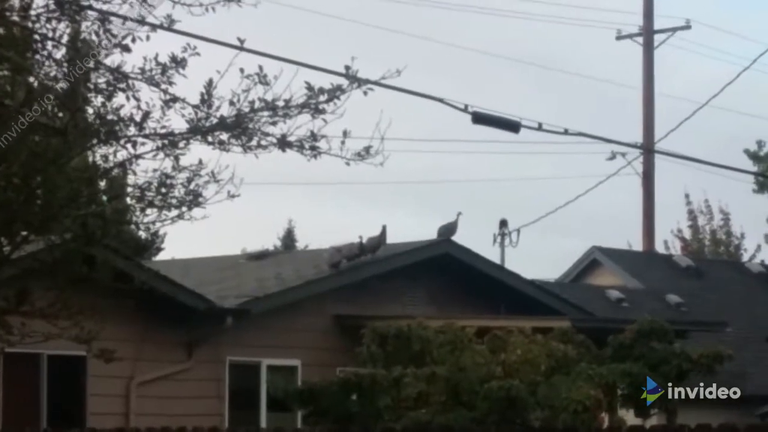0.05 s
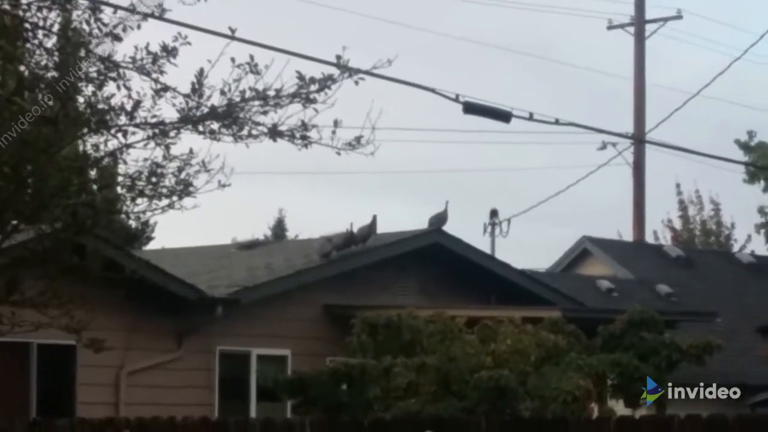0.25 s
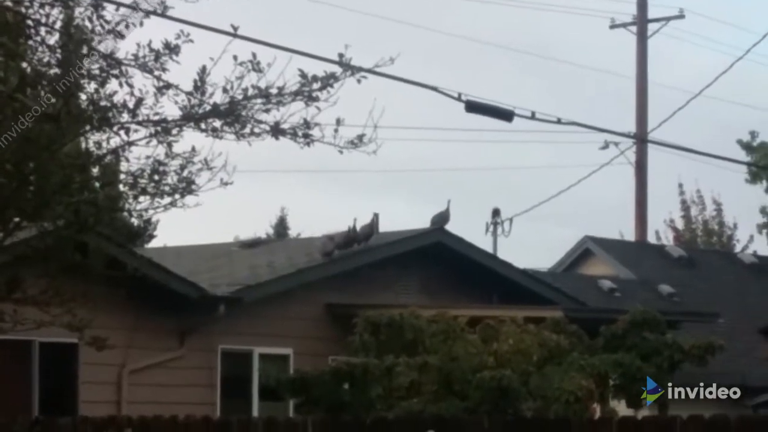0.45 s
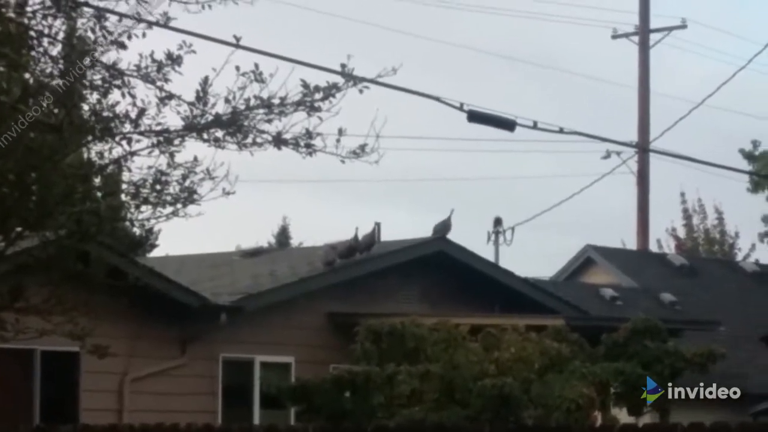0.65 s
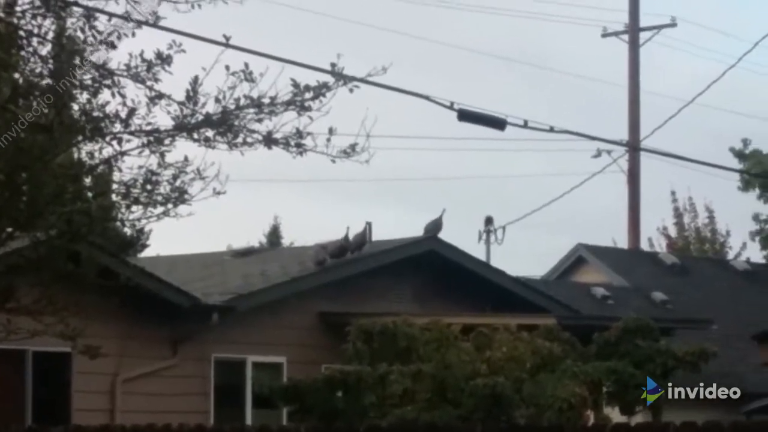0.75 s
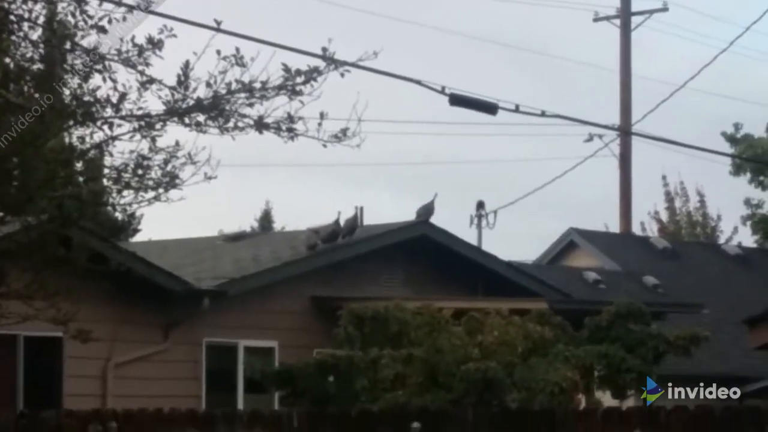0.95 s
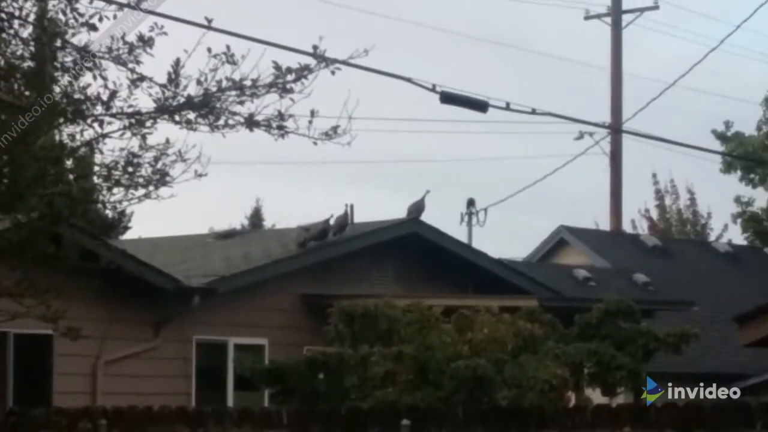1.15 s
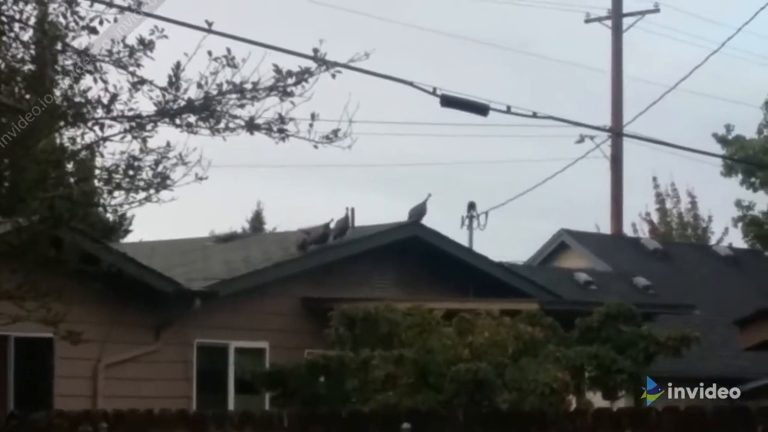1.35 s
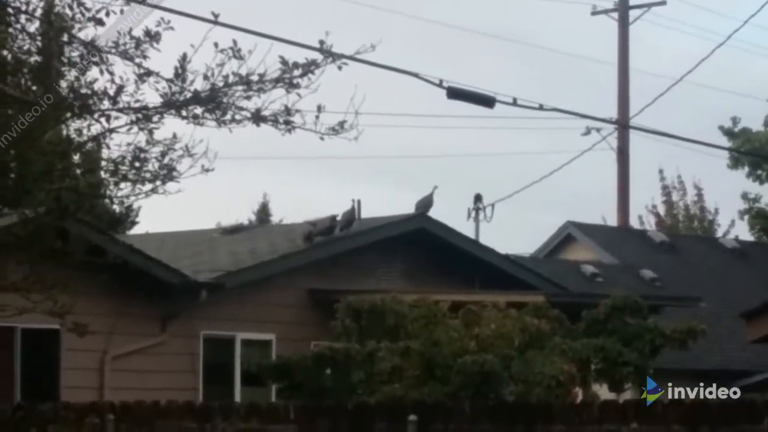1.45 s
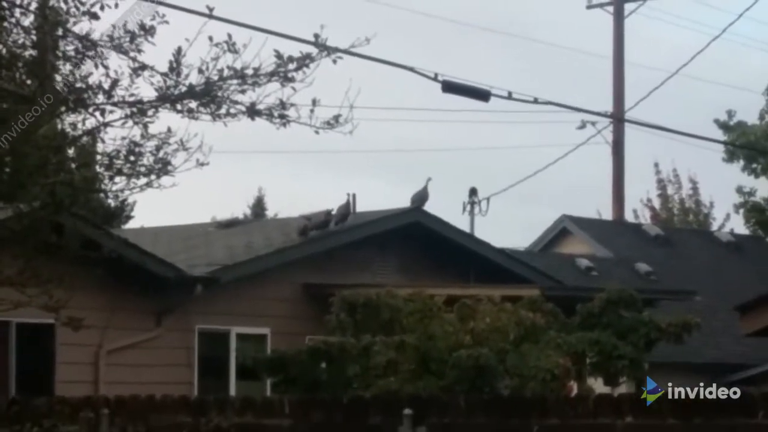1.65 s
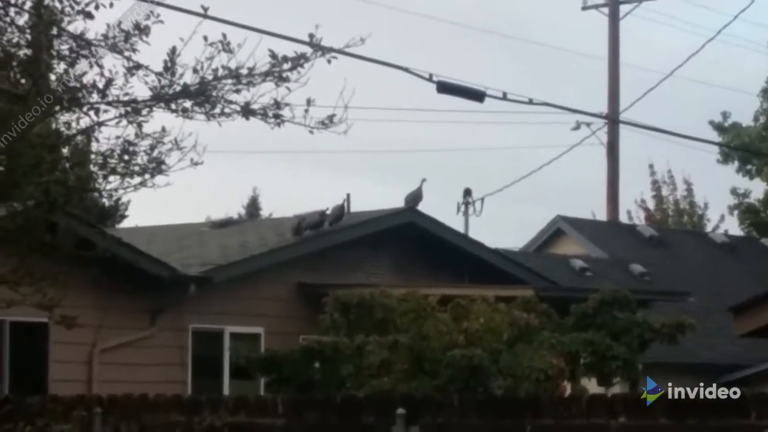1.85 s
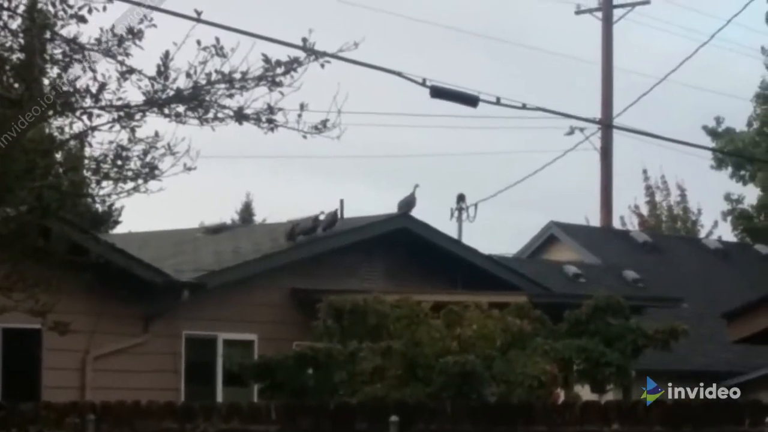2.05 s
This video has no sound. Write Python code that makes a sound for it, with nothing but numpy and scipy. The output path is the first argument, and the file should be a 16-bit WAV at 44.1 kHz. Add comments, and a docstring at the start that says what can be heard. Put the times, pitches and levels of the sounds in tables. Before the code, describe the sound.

Harsh, raspy cackling of several guinea fowl across a street, with thin echoes and low distant traffic

```python
"""Guinea fowl across a street

Several guinea fowl on a roof across the street cackle in short harsh notes: pulse trains and noise
drive windpipe, throat and beak resonances. Clear pips are single gliding tones.
Houses send the calls back as a thin long tail of scattered echoes. Beneath lie distant traffic,
made of shaped noise, a wavering low hum of two sines, and a few soft low bumps.
"""
import sys
import numpy as np
from scipy import signal
from scipy.fft import rfft, irfft
from scipy.io import wavfile
from scipy.ndimage import uniform_filter1d

SR = 44100
rng = np.random.default_rng(int(sys.argv[2]) if len(sys.argv) > 2 else 0)


def waveform_to_disk(signal):
    """Save audio, clipped to [-1, 1], as 16-bit WAV at the path in sys.argv[1]."""
    frames = np.transpose(np.atleast_2d(signal))
    scaled = np.clip(frames, -1, 1) * 32767
    samples = np.round(scaled).astype(np.int16)
    wavfile.write(sys.argv[1], SR, samples)


N = 92610
LEAD = 4410  # samples kept ahead of time zero, for a note already under way


def gain_of(db):
    """Level law: 20 dB is a factor of ten in amplitude."""
    return 10 ** (np.asarray(db) / 20)


def evened(x):
    """Normalisation to unit root-mean-square amplitude."""
    return x / np.sqrt(np.mean(x ** 2) + 1e-20)


def curve_at(points, hz):
    """Interpolation along logarithmic frequency, as hearing spaces pitch."""
    f, value = np.transpose(points)
    return np.interp(np.log(hz + 1), np.log(f + 1), value)


def add(mix, s, sound):
    """Superposition: pressures sum, from time s [s] onward."""
    part = mix[..., LEAD + round(s * SR):][..., :sound.shape[-1]]
    part += sound[..., :part.shape[-1]]


def resonate(x, hz, width_hz):
    """Heterodyne resonance: a double pole of unit peak gain follows a moving centre frequency."""
    turn = np.exp(2j * np.pi * np.cumsum(hz * np.ones(len(x))) / SR)
    r = np.exp(-np.pi * width_hz / SR)
    lowpassed = signal.lfilter([(1 - r) ** 2], [1, -2 * r, r * r], x / turn)
    return 2 * (turn * lowpassed).real


def placed(x, lead):
    """Interaural delay as linear phase: the left channel leads by a fraction of samples."""
    x = np.pad(x, 16)
    half_leads = lead * np.array([[1], [-1]])
    shift = np.exp(1j * np.pi * np.fft.rfftfreq(len(x)) * half_leads)
    return irfft(rfft(x) * shift, len(x))[:, 16:]


def note(start, length, db, swell_db, hz0, hz1, rough, beak0_hz, beak1_hz, low_db, high_db, lead):
    """Source and filter: uneven cycles and noise echo in the windpipe and ring throat and beak."""
    # broad rasp of the throat: (frequency [Hz], gain [dB])
    throat = [(300, -11), (900, -3), (2500, 1.5), (4600, -7.5), (5600, -20.5), (8000, -21.5), (11000, -30),
              (15000, -35)]
    rise_s, rise_share, fall_s = .003, .14, .007  # longer notes set in more slowly
    jitter, ragged_db = .1, 1.8  # pitch and level unevenness, both scaled by roughness below
    windpipe_hz, windpipe_echo = 565, .2
    beak_width_hz = 480  # widened by roughness below
    low_hz, low_width_hz, high_hz, high_width_hz = 1700, 300, 4150, 520
    rasp_db = -4.5  # at full roughness
    side_bird_hz, side_bird_db = 5070, -15

    noise, phase = rng.standard_normal((3, 4000)), rng.random((36, 1))
    t = np.arange(0, min(length + 0.002, .09), 1 / SR)
    u, rough = t / length, np.clip(rough, 0, 1)
    shake, ragged = (evened(uniform_filter1d(v, size=130))[:len(t)] for v in noise[:2])

    pulse_hz = (hz0 + (hz1 - hz0) * u) * (1 + jitter * rough ** 2 * shake)
    turns = np.cumsum(pulse_hz) / SR
    harmonics = np.arange(1, 37)[:, None]
    cycles = np.cos(2 * np.pi * (harmonics * turns + phase)).sum(0)
    drive = (1 - rough) * evened(cycles) + rough * noise[2, :len(t)]

    rise = t / (rise_s + rise_share * length)
    fall = (length + 0.0038 - t) / fall_s
    edge = np.sin(np.pi / 2 * np.clip(np.minimum(rise, fall), 0, 1))
    drive *= edge * gain_of(swell_db * (2 * u - 1) + ragged_db * np.sqrt(rough) * ragged)
    # feedback comb: each pass along the windpipe returns weaker
    round_trip = round(SR / windpipe_hz)
    drive = signal.lfilter([1], np.r_[1, np.zeros(round_trip - 1), -windpipe_echo], drive)

    arch = np.sin(np.pi * np.clip(u, 0, 1)) ** .6  # the outer colours bloom mid-note
    throat_gain = gain_of(curve_at(throat, np.fft.rfftfreq(len(t), 1 / SR)))
    rasp = arch * irfft(rfft(drive) * throat_gain, len(t))
    beak_hz = beak0_hz + (beak1_hz - beak0_hz) * u
    voice = resonate(drive, beak_hz, beak_width_hz * (0.96 + rough))
    voice += gain_of(rasp_db) * rough * rasp
    voice -= arch * gain_of(low_db) * resonate(drive, low_hz, low_width_hz)
    voice -= arch * gain_of(high_db) * resonate(drive, high_hz, high_width_hz)
    if lead > 3:  # the bird on the left sounds brighter: an extra top resonance
        voice += gain_of(side_bird_db) * resonate(drive, side_bird_hz, 970)
    return start, placed(gain_of(db) * evened(voice), lead)


def street(x):
    """Reverberation: a few quick roof reflections, then scattered echoes that die band by band."""
    # decay of the houses' echoes: (frequency [Hz], time to fall 60 dB [s])
    decay = [(600, 2.5), (2000, 1.73), (4000, 1.68), (7000, 0.32)]
    # colour that makes the echoes flatter than the calls: (frequency [Hz], gain [dB])
    tail_colour = [(500, 4), (1200, 7), (2600, -2), (4000, -2), (5200, 13), (8000, 6)]
    near_db, near_s, tail_db = -7, 0.012, -11.5
    tail_shared = .35  # share of each channel's echoes lent to the other

    taps = rng.choice([-1., 1.], (2, SR)) * (rng.random((2, SR)) < .04)
    taps = taps + tail_shared * taps[::-1]
    t = np.arange(SR) / SR
    near = taps * np.exp(-t / near_s) * (t > .001)
    hz, frame_s, z = signal.stft(taps * np.clip(t / 0.044, 0, 1), SR, nperseg=256)
    fall_db = 60 * frame_s / curve_at(decay, hz)[:, None]
    z = z * gain_of(curve_at(tail_colour, hz)[:, None] - fall_db)
    tail = signal.istft(z, SR, nperseg=256)[1][:, :SR]
    both = gain_of(near_db) * near / np.linalg.norm(near[0])
    both += gain_of(tail_db) * tail / np.linalg.norm(tail[0])
    return signal.fftconvolve(x[None], both, axes=1)[:, :len(x)]


def traffic():
    """Filtered random noise: short-time spectra with drifting patches and a slow swell."""
    # traffic spectrum: (frequency [Hz], relative density [dB per Hz])
    spectrum = [(25, -21), (50, -23), (75, -3.5), (120, -4.5), (160, -13.5), (250, -10.5), (430, -12.5),
                (730, -3.5), (1000, -2.5), (1400, -9.5), (2100, -11.5), (4100, -18), (4700, -31),
                (8000, -31), (15800, -31)]
    # likeness of the two channels: (frequency [Hz], left-right correlation [0-1])
    likeness = [(30, 1), (120, 1), (200, 1), (400, 0.86), (800, .3), (2000, 0.1), (5000, 0.13),
                (9000, 0.033), (14000, 0.2)]
    level_db, patch_db, swell_db = -44.5, 2.05, 0.75

    frames, hz = N // 512 + 6, np.fft.rfftfreq(2048, 1 / SR)
    a, b, c, d, patches = rng.standard_normal((frames, 1025, 5)).T
    patches = uniform_filter1d(uniform_filter1d(patches, size=16, axis=0), size=5, axis=1)
    swell = evened(uniform_filter1d(rng.standard_normal(frames), size=6))
    same = np.clip(curve_at(likeness, hz), -1, 1)[:, None]
    left = a + 1j * b
    right = same * left + np.sqrt(1 - same ** 2) * (c + 1j * d)
    colour_db = curve_at(spectrum, hz)[:, None] + patch_db * evened(patches) + swell_db * swell
    z = np.array([left, right]) * gain_of(colour_db)
    rumble = signal.istft(z, nperseg=2048, noverlap=1536)[1][:, 1024:N + 1024]
    return gain_of(level_db) * evened(rumble)


def hum():
    """Harmonic pair: a low drone and its octave, each wavering in level."""
    # drone: (time [s], frequency [Hz], level before the waver [dB])
    drone = [(0.0, 192.7, -81), (0.03, 190.8, -62), (0.47, 189.3, -56), (0.88, 188.8, -63.5),
             (0.95, 198.8, -62), (1.08, 184.3, -56), (1.23, 200.0, -65.5), (1.65, 184.9, -58),
             (2.1, 184.4, -67)]
    octave_db, waver_db = -5, 4
    s, hz, db = np.transpose(drone)
    t = np.arange(N) / SR
    turns = np.cumsum(np.interp(t, s, hz)) / SR
    waver = uniform_filter1d(rng.standard_normal((2, N)), size=1500)
    waver = evened(uniform_filter1d(waver, size=1500))
    level_db = np.interp(t, s, db) + waver_db * waver + [[0], [octave_db]]
    tones = np.sqrt(2) * np.sin(2 * np.pi * turns * [[1], [2]])
    return (gain_of(level_db) * tones).sum(0)


def pip(start, length, db, hz0, hz1, hz2):
    """Frequency modulation: a single gliding, slightly wobbling tone under a rounded envelope."""
    wobble_share = 0.0095  # of the frequency
    wobble = evened(uniform_filter1d(rng.standard_normal(2000), size=60))
    u = np.arange(0, min(length, .045), 1 / SR) / length
    glide_hz = np.interp(u, [0, .65, 1], [hz0, hz1, hz2])
    hz = glide_hz * (1 + wobble_share * wobble[:len(u)])
    tone = np.sqrt(2) * np.sin(2 * np.pi * np.cumsum(hz) / SR)
    return start, placed(gain_of(db) * np.sin(np.pi * u) ** .7 * tone, .4)


def bump(s, db, hz):
    """Damped oscillation: a low sine swells to its peak, then dies away exponentially."""
    peak_s = 0.0053
    t = np.arange(3000) / SR
    envelope = t / peak_s * np.exp(1 - t / peak_s)
    return s, gain_of(db) * envelope * np.sin(2 * np.pi * hz * t)


def scene():
    """Superposition of direct calls, their echoes, bumps, traffic and hum."""
    # cackle notes: (start [s], length [s], level [dB], swell each way from mid-note [dB],
    # pulse rate at start [Hz], at end [Hz], roughness [0-1], beak resonance at start [Hz],
    # at end [Hz], low resonance [dB], high resonance [dB], left lead [samples])
    cackles = [ (-.05, 0.091, -47.5, -9, 397, 399, 0.47, 2830, 2650, -23, 3, 0.54),
               (0.197, 0.038, -36, -4, 437.4, 448, 0.49, 3300, 2510, -9, -4.5, 1.2),
               (0.43, 0.035, -32, 2.5, 411, 424, 0.37, 2640, 2900, -6, -4, .7),
               (0.655, 0.038, -36.5, 2, 556.7, 551, 0.41, 3160, 3100, -3, -5, 0.65),
               (0.804, 0.017, -34.5, 2.5, 562, 582, 0.31, 3220, 3300, -0.5, -4, 0.62),
               (0.819, 0.06, -36, -6, 440, 457, 1, 2960, 3400, -1.5, 11, 5.5),
               (0.894, 0.027, -40, -5.5, 556, 599, 0.22, 3380, 3340, -5, -11, 0.33),
               (0.926, 0.011, -33, -2, 521, 586, 0.2, 3080, 3230, -3, -11, 1.3),
               (1.056, 0.037, -27.5, 0, 415, 370.8, 0.58, 3110, 2360, -5.5, -4.5, 1.1),
               (1.087, 0.029, -27.5, -3.5, 373.4, 380, 0.61, 2370, 2810, -3.5, -1, 1.2),
               (1.118, 0.02, -33.5, -19, 386, 394, 0.9, 3350, 3060, -4, 3, 4.1),
               (1.251, 0.0247, -32.5, -9, 405, 370.6, 0.64, 2990, 2580, -28, -3.5, 1.2),
               (1.277, 0.011, -29, 4.5, 387.6, 380.5, 0.37, 2280, 2280, -35, 2, 0.22),
               (1.296, 0.0083, -37.5, -8, 435, 420, 0.66, 2530, 2700, -15, 2, 1.6),
               (1.313, 0.012, -31, 11, 509.5, 517, 0.2, 3060, 3130, 1, -12, 1.6),
               (1.379, 0.062, -32, -1.5, 431.5, 443, 0.68, 2660, 2590, -2.5, 11, 4.64),
               (1.563, 0.031, -29, 3, 368, 367.6, 0.54, 3020, 2290, -4, -5, 0.9),
               (1.599, 0.013, -28, -1.5, 375.6, 399.4, 0.31, 2480, 2310, -9, -1, 0.22),
               (1.677, .047, -34, 3, 430.6, 430.5, 0.68, 3060, 2980, -2, 1, 0.97),
               (1.721, .012, -42, -8, 454, 423, 0.64, 2500, 2490, -12, -1, 0.88),
               (1.758, 0.044, -31.5, -0.5, 425, 414, 0.6, 3120, 2980, -3.5, 1.5, 4.5),
               (1.793, 0.046, -31.5, -7.5, 401, 377, 0.6, 2990, 2100, -11, -2.5, 1.5),
               (1.831, 0.011, -28.5, -20, 372.5, 360, 0.33, 2430, 2160, -9.5, -1, 0.22),
               (1.945, 0.0097, -43, -5, 457, 470, 0.54, 2060, 1870, -18, -24, 0.33),
               (2.018, .014, -49, -2, 523, 550, 0.3, 2930, 3100, 5, -3, 1.5), ]
    # clear pips: (start [s], length [s], level before the envelope [dB],
    # start frequency [Hz], later frequency [Hz], end frequency [Hz])
    pips = [ (0.187, 0.011, -51, 3470, 3340, 3200), (0.246, 0.025, -39, 3230, 3635, 3560),
            (0.263, 0.0092, -44.5, 3720, 4220, 4300), (0.425, 0.02, -41, 2890, 2870, 2830),
            (0.444, 0.012, -40, 4240, 4355, 4230), (0.462, 0.016, -37, 3380, 3230, 3260),
            (0.667, 0.014, -32, 2864, 2910, 2880), (.701, 0.011, -35, 4400, 3340, 3470),
            (0.797, 0.016, -29.5, 3025, 3020, 2960), (0.894, 0.0057, -33, 2840, 2890, 2880),
            (1.245, .012, -34, 2624, 2615, 2760), (1.56, 0.016, -46, 2470, 2440, 2570),
            (1.386, 0.017, -40, 2615, 2610, 2620), (1.68, 0.025, -45, 4146, 4196, 4100),
            (1.572, 0.013, -34.5, 2110, 2150, 2200), (2.077, 0.015, -41.5, 3930, 2780, 2980), ]
    # soft low bumps: (time [s], envelope peak [dB], frequency [Hz])
    thuds = [(0.516, -40, 179), (1.054, -42, 114), (2.045, -45.5, 176)]

    birds, bumps = np.zeros((2, N + LEAD)), np.zeros(N + LEAD)
    for row in cackles:
        add(birds, *note(*row))
    for row in pips:
        add(birds, *pip(*row))
    for row in thuds:
        add(bumps, *bump(*row))
    heard = birds + street(birds.mean(0)) + bumps
    return heard[:, LEAD:] + traffic() + hum()


def record(dry):
    """Linear filtering: two microphone ports differ in colour, then a low-pass limits the band."""
    # colour of the ports: (frequency [Hz], left minus right [dB])
    port_lean = [(200, 0), (500, .8), (1200, 1.3), (2800, .7), (5200, 5), (8000, 2.5), (13000, -.3)]
    edge_hz = 15800
    lean_db = curve_at(port_lean, np.fft.rfftfreq(N, 1 / SR))
    ports = irfft(rfft(dry) * gain_of(np.outer([.5, -.5], lean_db)), N)
    lowpass = signal.firwin(511, edge_hz, window=("kaiser", 9), fs=SR)
    return signal.oaconvolve(ports, lowpass[None], "same")


dry = scene()
out = record(dry)
waveform_to_disk(out)
```